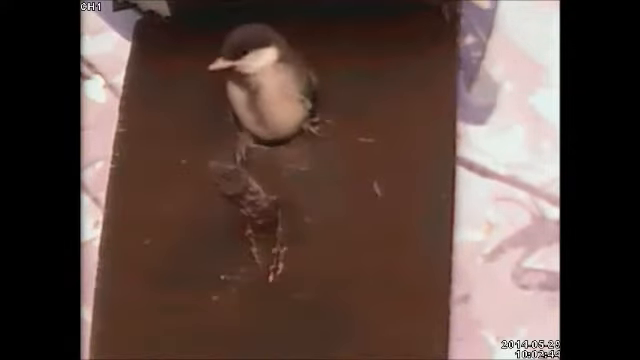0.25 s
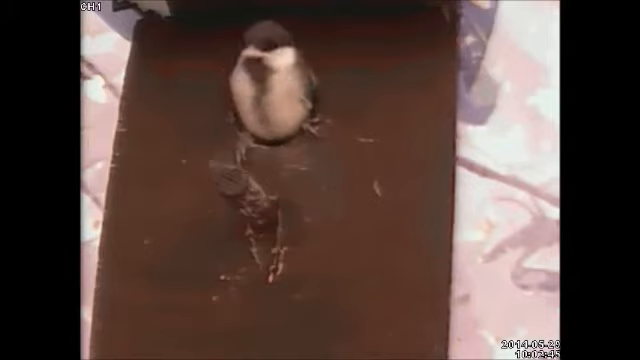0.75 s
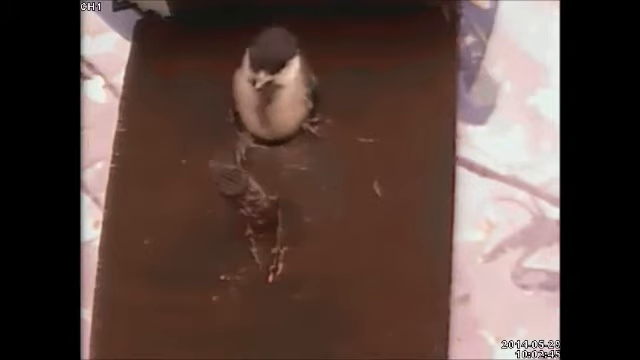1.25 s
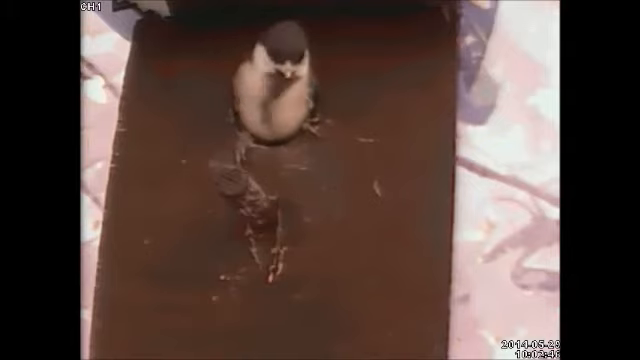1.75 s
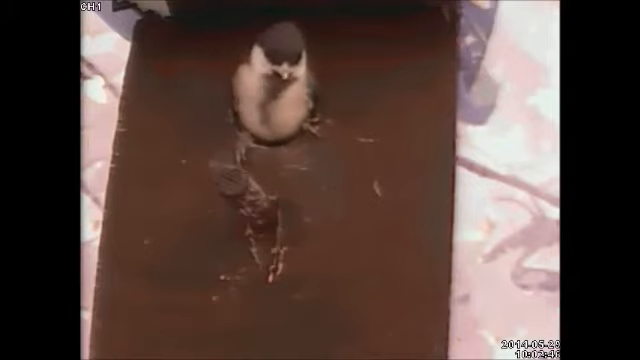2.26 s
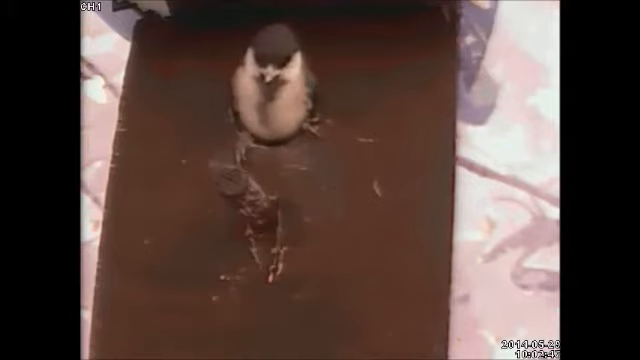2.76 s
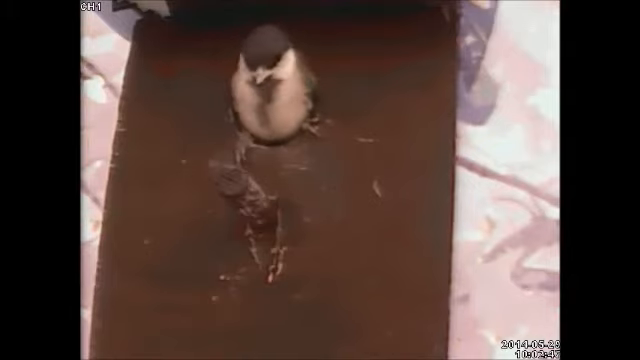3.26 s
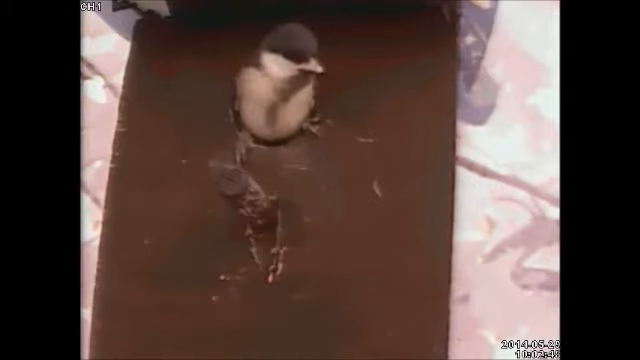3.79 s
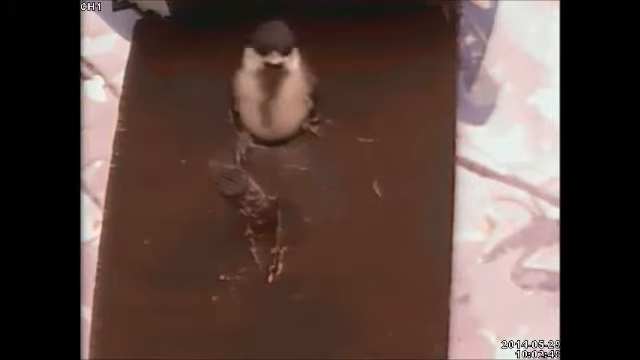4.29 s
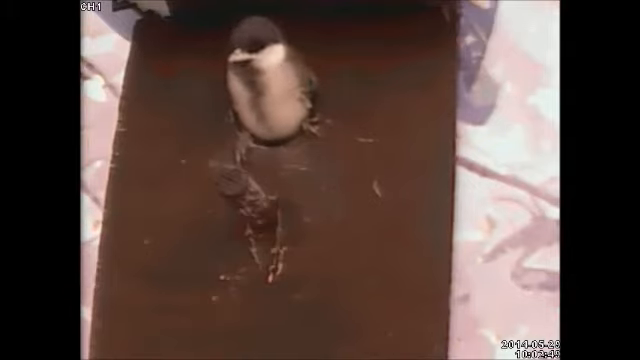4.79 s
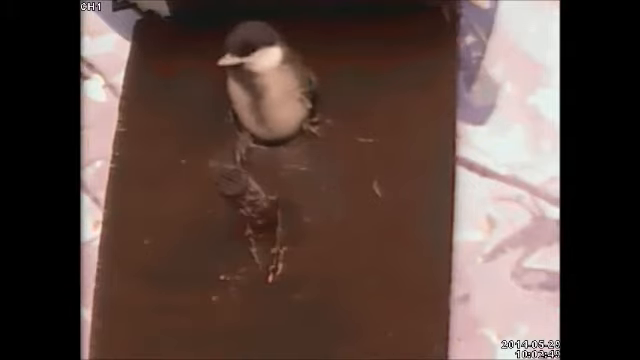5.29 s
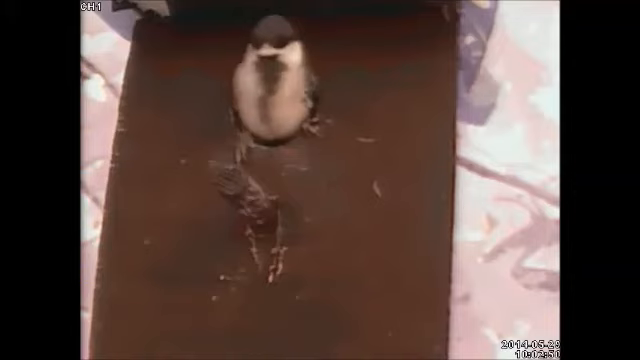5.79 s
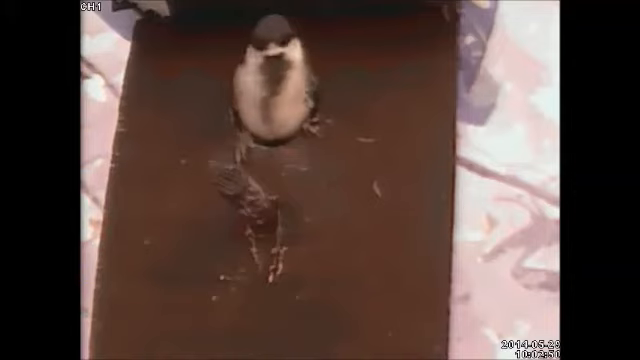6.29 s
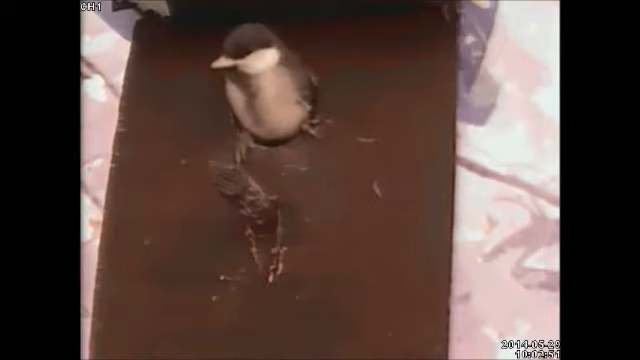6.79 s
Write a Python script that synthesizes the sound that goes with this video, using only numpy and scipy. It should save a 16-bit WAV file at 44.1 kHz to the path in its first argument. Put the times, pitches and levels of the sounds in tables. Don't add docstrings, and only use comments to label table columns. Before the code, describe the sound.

A small black-capped bird at a wooden nest box rasps five quick, hoarse calls, pauses, then gives five louder, higher ones that distort the close microphone, with a sharp tick between the first two. Claws scuff softly on wood over a low boxy traffic rumble. On the left, an outdoor microphone picks up distant echoing chirps, air hiss, mains buzz and one twig snap.

```python
import sys
import numpy as np
from scipy import signal
from scipy.fft import rfft, irfft, next_fast_len
from scipy.io import wavfile
from scipy.ndimage import uniform_filter1d

SR = 44100
rng = np.random.default_rng(int(sys.argv[2]) if len(sys.argv) > 2 else 0)


def bounce(signal):
    frames = np.transpose(np.atleast_2d(signal))
    limited = np.clip(frames, -1, 1)
    pcm = np.round(limited * 32767).astype(np.int16)
    wavfile.write(sys.argv[1], SR, pcm)


def ratio_of_db(decibels):
    return 10 ** (np.asarray(decibels, float) / 20)


N = 310905


def evened(x):
    return x / np.sqrt(np.mean(x ** 2) + 1e-20)


def colour(x, points):
    size = next_fast_len(len(x) + 512)
    hz, db = np.transpose(points)
    log_hz = np.log(np.fft.rfftfreq(size, 1 / SR) + 1)
    gain = ratio_of_db(np.interp(log_hz, np.log(hz), db))
    return irfft(rfft(x, size) * gain, size)[:len(x)]


def wander(count, hz, room=6000):
    noise = rng.standard_normal(max(count, room) + room)
    b, a = signal.butter(2, hz / (SR / 2))
    return evened(signal.lfilter(b, a, noise)[room:])[:count]


def add(mix, start_s, sound):
    part = mix[max(round(start_s * SR), 0):][:len(sound)]
    part += sound[:len(part)]


def tail(t60):
    t = np.arange(SR // 2) / SR
    reflections = rng.random(len(t)) < .1
    echo = rng.standard_normal(len(t)) * ratio_of_db(-60 * t / t60) * reflections
    return echo / np.linalg.norm(echo)


# pitch_hz [Hz], level_db [dB per Hz]
BOX_AIR = [(25, -13.5), (50, -8.5), (70, -8), (100, -0.5), (140, -2), (170, -9), (210, -20.5), (300, -33.5),
           (500, -39.5), (1000, -43), (2000, -48), (3000, -56), (7500, -61), (10500, -74.5)]
# time_s [s], level_db [dB]
TRAFFIC = [(0, -44.5), (.2, -49.5), (.41, -39.5), (.55, -54.5), (.61, -39.5), (.7, -47), (1.8, -45),
           (1.95, -49.5), (2.3, -48.5), (3.85, -46), (3.94, -54), (4.2, -46.5), (5.2, -49), (5.8, -47),
           (7.05, -49)]
LUMPS_DB, LUMPS_HZ = 1, 8.2


def rumble():
    s, db = np.transpose(TRAFFIC)
    air = evened(colour(rng.standard_normal(N), BOX_AIR))
    boom = colour(air, [(230, -3.5), (400, -41.0)])
    traffic_db = np.interp(np.arange(N) / SR, s, db)
    swell = ratio_of_db(traffic_db + 10.5 + LUMPS_DB * wander(N, LUMPS_HZ))
    flicker = ratio_of_db(-36.0 + 0.81 * wander(N, 40))
    return swell * boom + flicker * (air - boom)


# pitch_hz [Hz], level_db [dB per Hz]
YARD_AIR = [(30, -10), (75, -11), (225, 5), (500, -1.5), (1000, -4), (1700, -8), (2500, -10.5), (4500, -9),
            (6000, -13.5), (9000, -15.5), (11000, -17.5)]
YARD_DB = -57.5


def hiss():
    level = ratio_of_db(YARD_DB + 0.55 * wander(N, 6.7))
    return level * evened(colour(rng.standard_normal(N), YARD_AIR))


# start_s [s], level_db [dB],
# pitch factor [ratio], lead_db [dB]
CHIRPS = [(.074, -52, 1.0, 0), (1.045, -52.5, .97, -9), (2.14, -54, .95, -8), (3.3, -53.5, 1.02, -4.5),
          (4.0, -68.5, 1.0, -1), (4.4, -50.5, .98, -4.5), (4.7, -68, 1.03, 0), (4.913, -68.5, 1.0, 0),
          (5.381, -52.5, 1.0, 1.5), (5.9, -69.5, 0.99, -6.5), (6.345, -52.5, 1.0, -7)]
# delay_s [s], length_s [s], start_hz [Hz], end_hz [Hz], level_db [dB], warble_hz [Hz]
LEAD = (0, .03, 4900, 4951, 1, 139.5)
# delay_s [s], length_s [s], start_hz [Hz], end_hz [Hz], level_db [dB], warble_hz [Hz]
CHIRP_REST = [
    (0.019, .055, 4520, 3167, 0.5, 320),
    (.065, .09, 3580, 3796, -6, 380),
]
# start_s [s], length_s [s], start_hz [Hz], end_hz [Hz], level_db [dB]
SLURS = [(.39, 0.032, 3015, 2890, -58), (0.465, .033, 3760, 4900, -58.5), (0.647, 0.028, 5450, 6640, -63),
         (.689, .031, 3830, 4990, -59.5), (0.994, 0.046, 3900, 4490, -58), (1.24, .026, 6700, 6260, -63),
         (1.327, 0.076, 3410, 2040, -56.5), (2.115, .057, 1790, 2340, -62.5),
         (2.467, .03, 1902, 2050, -58.5), (2.45, 0.11, 3900, 4084, -64.5), (3.099, .067, 3254, 2850, -42),
         (4.159, 0.029, 5440, 5720, -58.5), (5.028, 0.07, 1884, 3850, -51), (5.083, 0.051, 3940, 2286, -58),
         (5.044, .07, 3800, 6300, -61.5)]
# start_s [s], length_s [s], start_hz [Hz], end_hz [Hz], level_db [dB]
WHISTLES = [(0, .47, 2280, 2187, -65), (0.829, .11, 5770, 5203, -56.5), (3.332, .15, 2790, 1500, -53.5),
            (2.573, .1, 2550, 2700, -50.5), (2.616, 0.036, 2320, 2032, -49),
            (2.732, .063, 1874, 1845, -48.5), (2.813, .24, 2114, 2224, -47),
            (4.292, .35, 7680, 8150, -76.5), (5.399, .56, 1946, 2080, -66.5), (5.893, .4, 2200, 2270, -64),
            (5.899, .5, 1980, 1933, -70)]
SLUR_WARBLE_HZ, WHISTLE_WARBLE_HZ = 157, 60


def far_notes():
    notes = []
    for s, db, pitch, lead_db in CHIRPS:
        for k, (delay, length, start_hz, end_hz, part_db, warble_hz) in enumerate([LEAD, *CHIRP_REST]):
            note_db = db + part_db + lead_db * (k == 0)
            notes.append((s + delay, length, pitch * start_hz, pitch * end_hz, note_db, warble_hz))
    notes += [(*row, SLUR_WARBLE_HZ) for row in SLURS]
    return notes + [(*row, WHISTLE_WARBLE_HZ) for row in WHISTLES]


def far_birds():
    out = np.zeros(N)
    for s, length, start_hz, end_hz, db, warble_hz in far_notes():
        count = round(length * SR)
        slide = np.linspace(0, 1, count) ** 0.84
        hz = start_hz + (end_hz - start_hz) * slide + warble_hz * wander(count, 140, room=21000)
        grain_db = np.clip(warble_hz / 70 * wander(count, 70, room=9000), -12, 3)
        tone = np.sin(2 * np.pi * np.cumsum(hz) / SR)
        add(out, s, ratio_of_db(db + grain_db + 4.5) * tone * signal.windows.tukey(count, .3))
    return 0.84 * out + 0.93 * signal.fftconvolve(out, tail(0.43))[:N]


MAINS_HZ, BUZZ_START_S = 50, .0074


def buzz():
    ms = 1000 * ((np.arange(N) / SR - BUZZ_START_S) % (1 / MAINS_HZ))
    dip = np.minimum(ms / 0.4, 1) * np.exp(-(ms / 0.48) ** 2)
    peak = 1.06 * np.exp(-((ms - 1.7) / 0.56) ** 2)
    sag = 0.37 * np.exp(-((ms - 4.5) / 2.0) ** 2)
    return ratio_of_db(-41.5) * (peak - dip - sag)


# start_s [s], level_db [dB], length_s [s]
SCUFFS = [(0.054, -56.5, 0.049), (0.211, -56, .015), (0.29, -43, 0.047), (.362, -55.5, 0.018),
          (0.403, -53, 0.012), (0.434, -46, 0.013), (.466, -51, .017), (0.61, -44, 0.041),
          (.868, -47.5, .021), (0.924, -49, 0.052), (1.712, -50, 0.023), (2.35, -47.5, 0.013),
          (2.818, -54, 0.013), (3.913, -58, .017), (4.248, -53.5, .016), (4.285, -48, 0.057),
          (4.338, -51, 0.02), (4.414, -56.5, 0.016), (4.433, -60, .017), (4.464, -54, 0.019),
          (4.498, -52, 0.028), (4.537, -48, .016), (5.183, -62, .021), (5.679, -49, .02),
          (5.715, -52, .014), (6.578, -52.5, .031), (6.61, -57, .016), (6.649, -54.5, 0.041)]
# pitch_hz [Hz], level_db [dB]
WOOD = [(60, -12.5), (250, 11), (500, -0.5), (1400, -6), (2500, -14), (3200, -43)]
GRIT_DB = -13


def claws():
    dull, grit = np.zeros((2, N))
    for s, db, length in SCUFFS:
        u = np.arange(round(2.5 * length * SR)) / (0.35 * length * SR)
        stroke = ratio_of_db(db) * np.e * u * np.exp(-u)
        add(dull, s - 0.49 * length, stroke)
        add(grit, s - 0.49 * length, ratio_of_db(GRIT_DB) * stroke)
    big_slips = ratio_of_db(2.76 * np.minimum(rng.exponential(1, N), 3.0)) * (rng.random(N) < .03)
    slips = rng.standard_normal(N) * (.3 + big_slips)
    slips = slips * np.sqrt(N) / np.linalg.norm(slips)
    bright = [(2000, -31), (3000, 1), (8000, -9), (10500, -25.0)]
    return 4.75 * colour(slips * dull, WOOD) + 2.7 * colour(slips * grit, bright)


OPENER_PEAK, OPENER_RISE_DB, OPENER_FALL_DB = (.76, .62), (-21.5, -29.5), (-18.5, -39)
OPENER_LOWER, OPENER_ROUGH = (.79, .842), (.45, 0.094, 0.13)


def opener(length, effort_db, from_hz, to_hz, burst):
    s = [0, OPENER_PEAK[burst] * length, length]
    shape_db = np.array([OPENER_RISE_DB[burst], 0, OPENER_FALL_DB[burst]])
    upper_hz = np.array([from_hz, to_hz, to_hz])
    return s, effort_db + shape_db, upper_hz, upper_hz * OPENER_LOWER[burst], OPENER_ROUGH


ONSET_DB, CLIMB_DB, LEAP_DB = (-18, -12.5), (-11, -10), (-2.5, -2)
SAG_DB, CLOSE_DB = (-1, -7), (-23.5, -36)
CLIMB_S, LEAP_S, SETTLE_S, RELEASE_S = (.013, .013), (.027, .025), (.04, .039), 0.017
ONSET_PITCH, CLIMB_PITCH = (.88, .73), (0.92, .87)
OVERSHOOT, DROOP = (1.011, 0.98), 0.89
LOWER_LEAD, LOWER_JUMP, LOWER_LEAP = .03, (.1, .01), (.3, .72)
ROUGH = (.5, .3, .2, .09, .08, .3)


def gesture(length, held_hz, below_hz, leap_hz, burst, effort_db):
    s = [0, CLIMB_S[burst], LEAP_S[burst], SETTLE_S[burst], length - RELEASE_S, length]
    shape_db = np.array([ONSET_DB[burst], CLIMB_DB[burst], LEAP_DB[burst], 0, SAG_DB[burst], CLOSE_DB[burst]])
    leap = leap_hz / held_hz
    upper = np.array([ONSET_PITCH[burst], CLIMB_PITCH[burst], leap, OVERSHOOT[burst], 1, DROOP])
    lower_leap = LOWER_JUMP[burst] + (LOWER_LEAP[burst] - 1) * (leap - 1)
    lower = upper + [LOWER_LEAD, LOWER_LEAD, lower_leap, 0, 0, 0]
    return s, effort_db + shape_db, held_hz * upper, (held_hz - below_hz) * lower, ROUGH


OVERTONES_DB = [
    (0, 0, -6, -55.5),
    (0, 0, -1, -45.5),
]
# pitch_hz [Hz], level_db [dB]
BEAK = [(1000, -27.5), (2250, -7.5), (2700, -41.5), (3100, -26), (3400, -12.5), (4200, -5), (4800, -9.5),
        (5600, -1), (6600, -2.5), (7400, -12), (8500, -10), (10000, -20.5), (11500, -33.5)]


def rasp(points, lower_db, coupling_db, hoarse):
    s, *columns = np.transpose(points)
    t = np.arange(s[0], s[-1], 1 / SR)
    curves = [uniform_filter1d(np.interp(t, s, c), size=220, mode="nearest") for c in columns]
    effort_db, upper_hz, lower_hz, rough = curves
    rough = np.clip(hoarse * rough, 0, 1)
    soft_db = 0.33 * (effort_db.max() - effort_db)
    voices = []
    for hz, overtones in zip((upper_hz, lower_hz), OVERTONES_DB):
        jitter = 1 + .06 * rough * wander(len(t), 350)
        phase = 2 * np.pi * np.cumsum(hz * jitter) / SR
        voices.append(sum(ratio_of_db(db - k * soft_db) * np.cos((k + 1) * phase) for k, db in enumerate(overtones)))
    upper, lower = voices
    source = upper + ratio_of_db(lower_db) * lower + ratio_of_db(coupling_db) * upper * lower
    breath = 1.3 * rough * wander(len(t), 15000)
    source = source * (1 + 0.91 * rough * wander(len(t), 300)) + breath
    sound = colour(source, BEAK)
    sound = sound / np.sqrt(uniform_filter1d(sound ** 2, size=500) + 1e-6)
    sound = sound * ratio_of_db(9.1 * rough * np.clip(wander(len(t), 160), -2.5, 1))
    return ratio_of_db(effort_db + 2.5) * sound * signal.windows.tukey(len(t), .22)


# start_s [s], length_s [s], effort_db [dB], from_hz [Hz], to_hz [Hz] (upper voice)
OPENERS = [
    (.974, .061, -21.5, 2750, 3008),
    (3.216, 0.071, -9.5, 2445, 3035),
]
# start_s [s], length_s [s], held_hz [Hz] (upper voice),
# below_hz [Hz] (lower voice under it), leap_hz [Hz] (top of the leap)
RASPS = [
    [(1.077, 0.077, 3052, 505.3, 3093), (1.19, 0.079, 3072, 511.4, 3823), (1.302, 0.081, 3096, 514.2, 3930),
     (1.444, 0.082, 3022, 480.7, 4063)],
    [(3.34, 0.083, 3270, 561, 3770), (3.455, 0.096, 3364, 578.7, 4335), (3.587, 0.1, 3342, 579, 4415),
     (3.742, 0.1, 3318, 601.4, 4620)],
]
EFFORT_DB, EFFORT_STEP_DB = (-15, -7.5), (-2, -1.67)
LOWER_DB, LOWER_STEP_DB = (2.5, -2.5), (-1.86, -2)
COUPLING_DB, COUPLING_STEP_DB = (-11, -3.5), (1.5, 0.07)
HOARSE, HOARSE_STEP = (1.41, 0.887), (.15, .01)


def bird():
    out, rush = np.zeros((2, N))
    for burst, calls in enumerate(RASPS):
        for k, (start, length, *rest) in enumerate([OPENERS[burst], *calls]):
            effort_db = EFFORT_DB[burst] + (k - 1) * EFFORT_STEP_DB[burst]
            points = gesture(length, *rest, burst, effort_db) if k else opener(length, *rest, burst)
            lower_db = LOWER_DB[burst] + k * LOWER_STEP_DB[burst]
            coupling_db = COUPLING_DB[burst] + k * COUPLING_STEP_DB[burst]
            hoarse = HOARSE[burst] + k * HOARSE_STEP[burst]
            add(out, start, rasp(np.transpose(points), lower_db, coupling_db, hoarse))
            puff = np.hanning(round((length + 0.032) * SR))
            add(rush, start - .016, ratio_of_db(max(points[1]) - 17) * puff)
    air = evened(colour(rng.standard_normal(N), [(500, 2), (2500, 5.5), (6500, -3.5), (11000, -10.5)]))
    ring = signal.fftconvolve(out, tail(0.073))[:N]
    return out + rush * air + ratio_of_db(-28.0) * ring


# pitch_hz [Hz], level_db [dB]
SNAP = [(1000, -29.5), (2100, 0), (3000, -11.5), (5800, 1), (7000, -4), (8500, 5.5), (11000, -16)]
SNAP_S, SNAP_DB = 1.547, -39


def snap():
    t = np.arange(SR // 5) / SR
    crack, scatter = ratio_of_db(-60 * t / .04), ratio_of_db(-8 - 60 * t / .26)
    burst = (crack + scatter) * np.minimum(t / .002, 1)
    out = np.zeros(N)
    add(out, SNAP_S, ratio_of_db(SNAP_DB) * burst * evened(colour(rng.standard_normal(len(t)), SNAP)))
    return out


# start_s [s], peak_db [dB]
BEAK_CLICKS = [
    (3.337, -20),
    (3.3422, -4),
]


def beak_clicks():
    u = np.linspace(-7, 7, num=15) / .95
    out = np.zeros(N)
    for s, db in BEAK_CLICKS:
        add(out, s, ratio_of_db(db) * (u ** 2 - 1) * np.exp(-u ** 2 / 2))
    return out


def scene():
    far = far_birds()
    dulled = colour(far, [(1500, -16.5), (2500, -17), (5000, -29.5)])
    through_wall = signal.fftconvolve(dulled, tail(.06))[:N]
    return np.array([far + hiss() + snap(), bird() + claws() + rumble() + through_wall])


# pitch_hz [Hz], level_db [dB]
PRODUCTS = [(20, -10.5), (45, 6.5), (300, 0), (1100, -2), (2500, -6.5), (5000, -8), (11300, -18.5)]


def overloaded(x):
    treble = colour(x, [(900, -38.5), (1800, 1.5)])
    squashed = 0.42 * np.tanh(treble / 0.45)
    rectified = np.sqrt(squashed ** 2 + 0.08 ** 2) - .08
    products = colour(rectified, [(1, -64), *PRODUCTS])
    return 0.79 * np.tanh((x - treble + squashed + 2.045 * np.roll(products, shift=3)) / 0.68)


def starved(x):
    hz, _, z = signal.stft(x, SR, nperseg=2048)
    power_db = 10 * np.log10(uniform_filter1d(abs(z) ** 2, size=5, axis=1) + 1e-20)
    usual_db = np.median(power_db, axis=2, keepdims=True)
    margin_db = np.reshape([3.2, 1.2], (2, 1, 1))
    under_db = usual_db - margin_db - power_db
    keep = np.where(hz[:, None] > 1700, ratio_of_db(-np.clip(12.0 * under_db, 0, 25)), 1)
    return signal.istft(z * keep, SR, nperseg=2048)[1][:, :N]


def top_cut(x):
    return signal.sosfilt(signal.butter(12, 17510, fs=SR, output="sos"), x)


def record(dry):
    both = starved(np.array([dry[0] + buzz(), overloaded(dry[1])]))
    edge = signal.firwin(numtaps=401, cutoff=12150, window=("kaiser", 9), fs=SR)
    both = signal.oaconvolve(both, edge[None], "same")
    both[1] += beak_clicks()
    return top_cut(both)


dry = scene()
out = record(dry)
bounce(out)
```